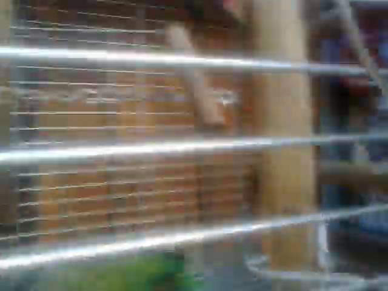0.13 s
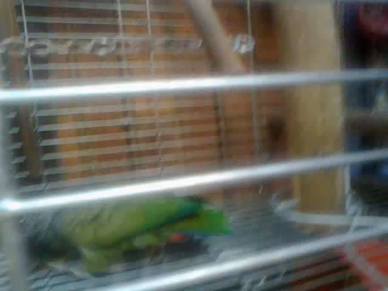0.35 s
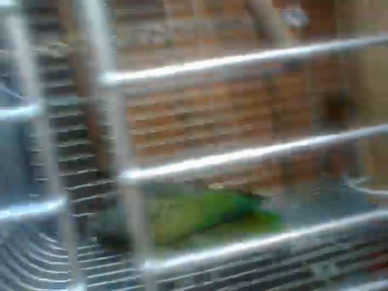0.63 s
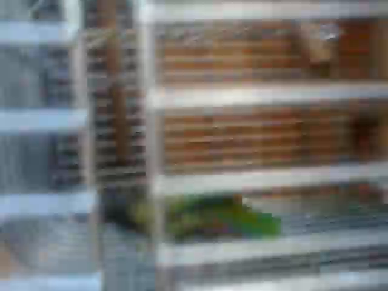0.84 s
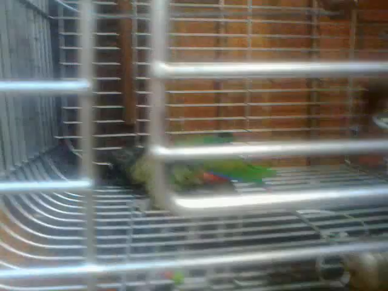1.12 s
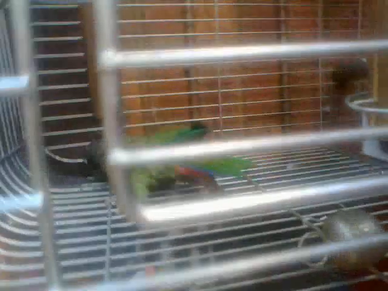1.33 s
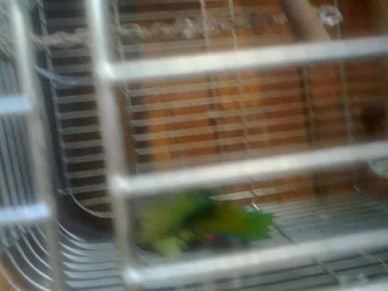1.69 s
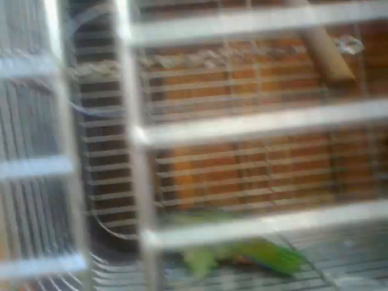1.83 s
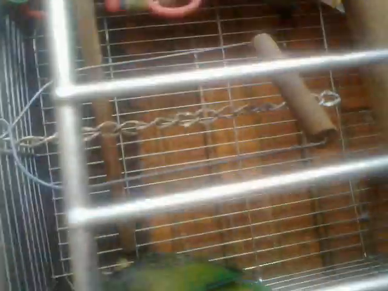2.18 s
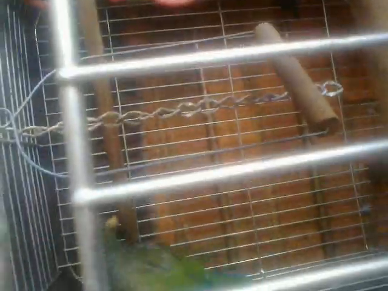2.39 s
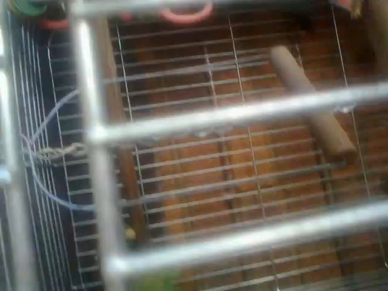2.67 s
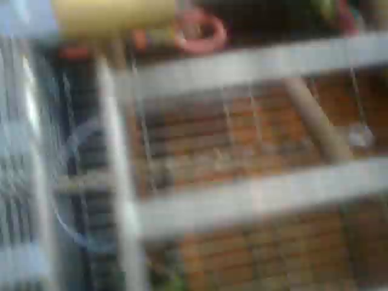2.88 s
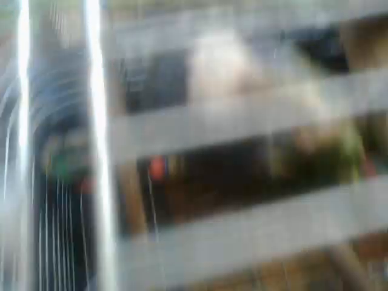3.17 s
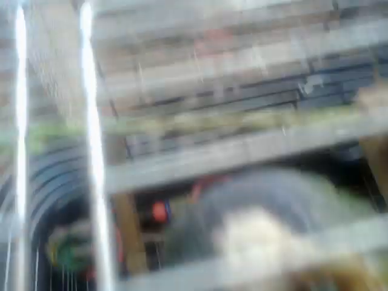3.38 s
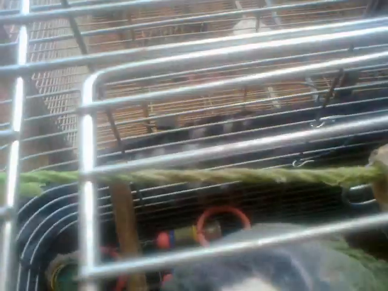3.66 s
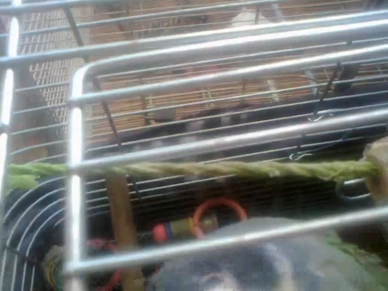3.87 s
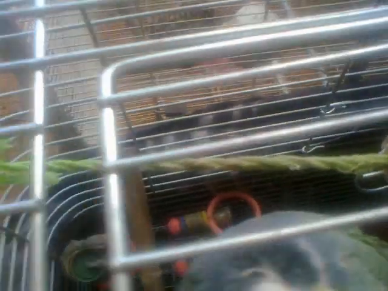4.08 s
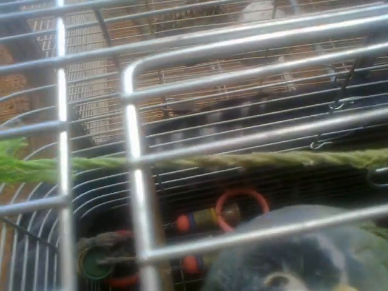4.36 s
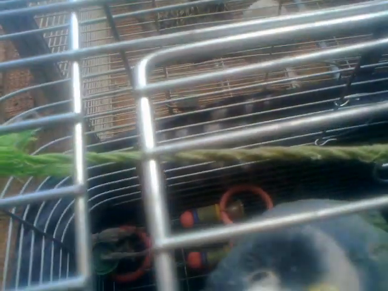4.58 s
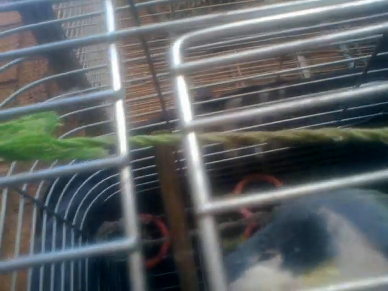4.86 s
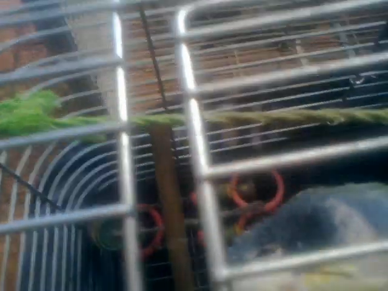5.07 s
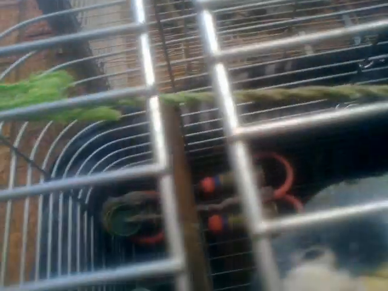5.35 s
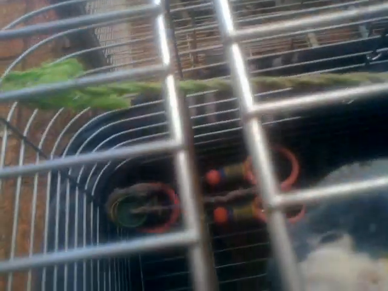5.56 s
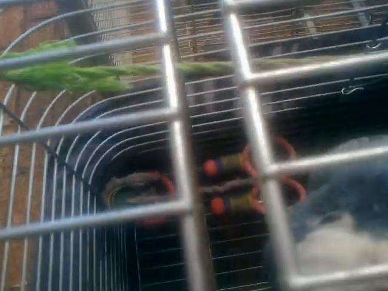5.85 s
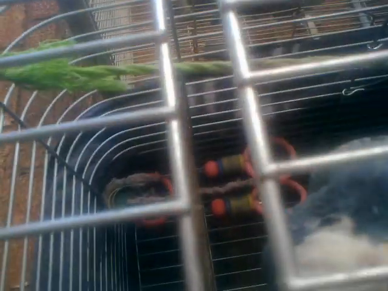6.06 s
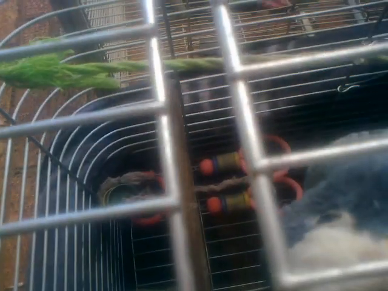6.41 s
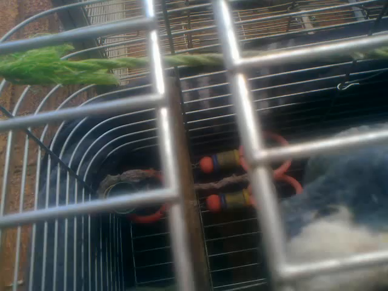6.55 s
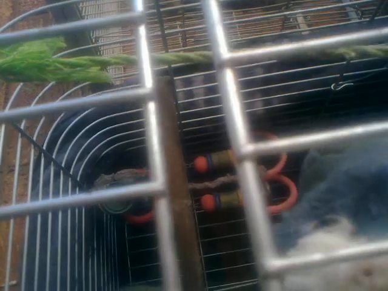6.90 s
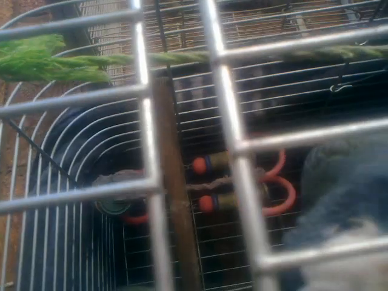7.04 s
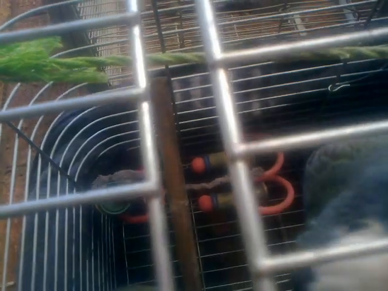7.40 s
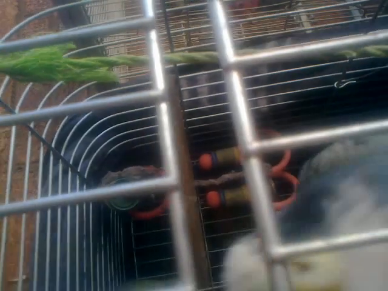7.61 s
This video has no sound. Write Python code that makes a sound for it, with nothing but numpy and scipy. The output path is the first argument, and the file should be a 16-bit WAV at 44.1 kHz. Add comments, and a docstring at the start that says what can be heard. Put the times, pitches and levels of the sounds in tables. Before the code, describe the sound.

A hand-held camera rubs and knocks on cage bars, a wire pings and a joint creaks, then a parrot's beak cracks dry shells.

```python
"""Parrots crack peanut shells in a wire cage in a small room, close to a hand-held camera. At first the camera
rubs and knocks along the bars (shaped noise and tiny chirps); short scuffs follow. Then a wire pings as a set
of fading tones, something drags along the cage and bumps, and a joint creaks in slips. Next a beak snaps the
dry shell piece by piece (bursts of clicks), amid nibbling and fine crackle. One bird gives soft, hoarse mutters
(noisy pulses); a few thin squeaks come among the last snaps."""
import sys
import numpy as np
from scipy import signal
from scipy.fft import rfft, irfft, next_fast_len
from scipy.io import wavfile
from scipy.ndimage import map_coordinates

SR = 44100
rng = np.random.default_rng(int(sys.argv[2]) if len(sys.argv) > 2 else 0)


def file_out(sig):
    """Save sig as 16-bit WAV at sys.argv[1]."""
    # one column per channel
    cols = np.atleast_2d(sig).T
    # limit, then scale
    lim = np.clip(cols, -1, 1)
    pcm = np.round(lim * 32767).astype(np.int16)
    wavfile.write(sys.argv[1], SR, pcm)


N = 340893
SIZE = 2048  # samples in a short pulse
HZ = np.fft.rfftfreq(SIZE, 1 / SR)  # the frequencies of such a pulse
TIME = np.arange(N) / SR  # seconds

# breaks in the shell: t/s, level/dB, hollow pod level/dB, pod resonance f/Hz, extra top treble/dB, tear length/s
CRACKS = [(2.6957, -53.5, -8, 1000, -14, .002), (2.8474, -45, -7, 1210, -15, .0033),
          (3.0182, -38, -24, 2080, -17, 0.00073), (3.0864, -45, 10, 1430, 0, .004),
          (3.304, -44, 1.5, 2720, 9, 0.021), (3.3408, -48, 11, 1210, 2, 0.0021),
          (3.4097, -41.5, -18, 1900, 5, 0.0008), (3.585, -35, -16, 2430, -4, 0.00099),
          (3.7501, -30.5, -3, 2430, 2, 0.0013), (3.755, -19.5, -20, 2500, 10, .0018),
          (3.7806, -19.5, -12, 2200, 1.5, 0.00059), (3.7986, -26, -6, 1700, 6, .0004),
          (3.824, -39, -6, 1940, 7, .0037), (3.8361, -29.5, 6, 1800, 12, .003),
          (3.8393, -20, 5, 1600, 4, 0.0022), (3.8856, -34.5, 3, 2200, 10, .0009),
          (3.9086, -29.5, 14, 1210, 7, 0.00095), (3.9807, -42, -1, 2410, 7, .0006),
          (3.993, -38.5, 3, 2620, 11, .005), (4.044, -37.5, 6.5, 2000, 15, 0.00034),
          (4.0546, -36, -12, 2200, 11, .0016), (4.355, -47.5, 8, 1890, -1, .003),
          (4.389, -46.5, -4, 2200, -7, 0.0023), (4.4486, -44, 3, 1300, 5, 0.0018),
          (4.505, -49.5, 3, 2800, 8, .004), (4.549, -45, -2, 2800, 8, 0.0099),
          (4.8142, -48, -13, 2500, 4, .0035), (4.8712, -42, -7, 1800, 6, .004),
          (4.9334, -38, 0, 2770, -6, 0.004), (4.9446, -35.5, 1, 2500, 7, 0.0089),
          (4.9656, -34.5, -8, 2500, 3, 0.0065), (4.9856, -26.5, -1, 3130, 4, 0.0023),
          (5.176, -47.5, 2, 1300, 4, 0.018), (5.273, -52, 9, 2350, 1, .004),
          (5.346, -33.5, 1, 2200, 10, 0.0065), (5.3631, -24.5, 1.5, 2430, 7, .003),
          (5.427, -43, -3, 2290, 7, 0.0037), (5.4775, -22, -2, 2350, 11, 0.0015),
          (5.6223, -21.5, -3, 2400, -8.5, 0.0012), (5.7236, -48.5, 1, 2100, 10, 0.004),
          (6.263, -52.5, -3, 2500, -8, 0.0036), (6.3611, -36.5, 3.5, 2330, 11, .0027),
          (6.3838, -37, -5, 2000, 6, .002), (6.3921, -29.5, 4.5, 2020, 13.5, 0.0013),
          (6.4383, -40, 11, 2300, 2, .0036), (6.5078, -29, -6, 2260, 2, 0.0032),
          (6.51, -31, 5, 2310, 5.5, 0.0014), (6.843, -49, -18, 2000, -1, 0.0059),
          (6.963, -41, 10, 1380, -1, .0037), (6.9826, -44, -9, 1900, 8, 0.0038),
          (7.055, -30, 1, 2530, 6.5, 0.0026), (7.0641, -32, -2, 2730, 6, 0.0016),
          (7.385, -46.5, -18, 1910, 12, .0027), (7.4084, -45.5, 8, 1670, 4, .004),
          (7.5257, -19.5, -13, 1970, 7, 0.002), (7.5356, -33, -8, 2700, 9, .0015)]
# tone colour of dry shell: f/Hz, level/dB
SHELL = [(200, -28), (700, -19.5), (1200, -14), (2200, -15.5), (3400, -13), (4700, -5), (6200, 2.5),
         (7600, -1), (9200, 0), (11000, -4.5), (13000, -11), (16000, -17)]


def amp(db):
    """Turn decibels into a gain."""
    return 10 ** (np.asarray(db) / 20)


def unit(x):
    """Scale to an rms (average strength) of 1."""
    return x / np.sqrt(np.mean(x ** 2) + 1e-20)


def blow(x):
    """Scale a short pulse so that its energy is that of 5 ms at rms 1."""
    return x * np.sqrt(.005 * SR / np.sum(x ** 2))


def along(points, hz):
    """Read a curve of (Hz, value) points on a log frequency axis."""
    f, v = np.transpose(points)
    return np.interp(np.log(hz + 1), np.log(f), v)


def curves(rows):
    """Give one value per sample for each column after the time."""
    s, *cols = np.transpose(rows)
    return [np.interp(TIME, s, c) for c in cols]


def wobble(rate):
    """Make a smooth random curve with this many knots a second."""
    knots = rng.standard_normal(int(N * rate / SR) + 4)
    coarse = TIME[::8]
    return np.interp(TIME, coarse, map_coordinates(knots, [coarse * rate]))


def filtered(x, response):
    """Shape x by a response that depends on frequency."""
    m = next_fast_len(len(x) + 8192)
    spectrum = rfft(x, m) * response(np.fft.rfftfreq(m, 1 / SR))
    return irfft(spectrum, m)[:len(x)]


def noise(spectrum, grain_db=0):
    """Coloured noise of rms 1; grain_db clumps it into tiny catches."""
    drive = rng.standard_normal(N) * amp(grain_db * wobble(700))
    return unit(filtered(drive, lambda hz: amp(along(spectrum, hz))))


def causal(db):
    """The response with these gains on the HZ grid that acts as early as possible (minimum phase)."""
    c = irfft(np.log(amp(db)))
    return np.exp(rfft(np.r_[c[0], 2 * c[1:SIZE // 2]], SIZE))


def hump(hz, centre_hz, q):
    """One resonance; a larger q makes it narrower."""
    return 1 / (1 + 1j * q * (hz / centre_hz - centre_hz / (hz + 1)))


def resonances(modes):
    """The joint response of several (Hz, Q, dB) resonances, with alternating signs."""
    return lambda hz: sum((-1) ** k * amp(db) * hump(hz, centre, q) for k, (centre, q, db) in enumerate(modes))


def envelope(s, length, attack, t60):
    """Rise from s, hold until s + length, die away by 60 dB in t60."""
    t = TIME - s
    return np.clip(t / attack, 0, 1) * amp(-60 * np.clip((t - length) / t60, 0, 3))


def add(track, s, x):
    """Mix x into track at s seconds."""
    i = max(round(s * SR), 0)
    track[i:i + len(x)] += x[:N - i]


def in_room(x, wet_db, spread=None):
    """A sound plus a diffuse tail from cage and walls; spread is what it sends in all other directions."""
    # how fast the tail dies: f/Hz, time to fall 60 dB/s
    tail_times = [(300, 0.27), (2000, 0.22), (7000, 0.23), (11000, 0.21), (16000, 0.16)]
    hz, t, z = signal.stft(rng.standard_normal(SR // 3), SR, nperseg=256)
    fading = z * amp(-60 * t / along(tail_times, hz)[:, None])
    tail = signal.istft(fading, SR, nperseg=256)[1]
    t = TIME[:len(tail)]
    tail = tail * (1 + 1.03 * np.exp(-t / 0.014)) * (1 - np.exp(-t / 0.0012))  # stronger early, soft onset
    wet = signal.fftconvolve(x if spread is None else spread, tail / np.linalg.norm(tail))
    return np.pad(x, (0, len(tail) - 1)) + amp(wet_db) * wet


def background():
    """Room rumble and hiss, a faint high whine and low stirring, all made from filtered noise."""
    # colour of the room's rumble and hiss: f/Hz, level/dB
    air_colour = [(12, -28), (20, 5), (65, 4), (177, -10), (357, -15), (607, -21), (849, -24.5),
                  (1190, -34), (2080, -25), (2990, -28.5), (9670, -29), (10500, -32), (14700, -33),
                  (16000, -40)]
    # colour of the low stirring: f/Hz, level/dB
    stir_colour = [(70, -21), (150, 4), (280, 1.5), (430, 3.5), (700, -7.5), (1000, -3), (1800, -16),
                   (4000, -20), (8000, -38)]
    # course of the stirring: t/s, relative level/dB
    stir_course = [(1.1, -59), (1.19, -59.5), (2.24, -55.5), (2.57, -57.5), (2.79, -62), (3.65, -60),
                   (4.13, -68.5), (4.54, -54.5), (4.68, -65), (5.57, -62), (7.27, -67.5), (7.7, -69)]
    stir_db, = curves(stir_course)
    air = amp(-55.5 + .8 * wobble(7.6)) * noise(air_colour)
    whine_tone = filtered(rng.standard_normal(N), lambda hz: hump(hz, 10450, q=50) ** 2)
    whine = amp(-82.0) * unit(whine_tone)
    stir = amp(stir_db - 1.0 + 2.55 * wobble(12)) * noise(stir_colour, grain_db=2.5)
    return air + whine + stir


def rubbing():
    """The camera slides over the wires in strokes: rumble, a dull lumpy body noise, a grainy scrape, fine hiss."""
    # strokes along the cage: t/s, length/s, rumble level/dB, body level/dB, scrape level/dB, hiss level/dB
    strokes = [(-.02, 0.053, -49, -32, -41.5, -48.5), (0.051, .055, -42.5, -35.5, -44.5, -48.5),
               (0.106, 0.05, -42.5, -38.5, -46.5, -68), (0.168, 0.049, -52, -35.5, -36.5, -60),
               (0.26, 0.081, -58, -37.5, -44.5, -47), (0.339, 0.087, -58, -49.5, -46.5, -49),
               (0.432, 0.078, -57, -38.5, -42.5, -60), (0.521, 0.056, -51, -39, -41, -55.5),
               (0.598, 0.13, -45.5, -39, -40.5, -47.5), (0.735, 0.095, -38.5, -33.5, -37.5, -39.5),
               (0.851, 0.073, -36.5, -39.5, -36.5, -42.5), (0.97, 0.06, -38, -47.5, -43, -51.5),
               (1.1, 0.065, -49.5, -58.5, -67, -76)]
    # colours of the four noises, each: f/Hz, level/dB
    rumble_colour = [(10, -16), (25, -3.5), (60, -5), (110, -7), (180, -17), (400, -59)]
    body_colour = [(60, -28), (130, -18), (210, -7.5), (270, -4), (330, -0.5), (420, 0.5), (530, -2.5),
                   (640, -9), (1100, -20.5), (1800, -41)]
    scrape_colour = [(400, -8), (1000, 4), (1700, -2), (3500, -9), (6000, -26), (12000, -41)]
    hiss_colour = [(1500, -3), (4500, 0.5), (8500, 0), (12000, -5), (16000, -16)]
    power = 0
    for s, length, *levels in strokes:
        power = power + np.outer(amp(levels), envelope(s, length, attack=0.023, t60=0.2)) ** 2
    rumble = noise(rumble_colour)
    body = amp(1.9 * wobble(60.45)) * noise(body_colour, grain_db=3.5)
    scrape = amp(2.43 * wobble(89.8)) * noise(scrape_colour, grain_db=1.5)
    hiss = noise(hiss_colour, grain_db=2.5)
    return np.sum(np.sqrt(power) * [rumble, body, scrape, hiss], axis=0)


def knocks():
    """Bending waves in a bar bring the treble first, so each knock is a tiny falling chirp; dull ones shake the frame."""
    # knocks on the bars beside the camera: t/s, level/dB, centre f/Hz
    hits = [(0.094, -24, 830), (0.1047, -19.5, 764), (0.1516, -32.5, 412), (0.1966, -28, 1450),
            (0.265, -33, 2510), (0.2723, -22.5, 407), (0.6491, -18, 1650), (0.6926, -23, 935),
            (0.7088, -29.5, 467), (0.811, -21, 337), (0.8622, -26, 360), (0.8662, -18, 460),
            (0.877, -11.5, 330), (0.8801, -25, 350), (0.8869, -29, 374), (1.0177, -20, 1770)]
    # the shaken cage frame: f/Hz, time to fall 60 dB/s, relative level/dB
    frame_modes = [(163, 0.035, 1), (218, 0.1, -3.5), (327, 0.088, 0.5), (645, .06, -26)]
    out, t = np.zeros(N), TIME[:SR // 8]
    travel = np.exp(-4j * np.pi * 0.0399 * np.sqrt(HZ))  # delays low pitches more
    for s, db, centre_hz in hits:
        contact = hump(HZ, centre_hz, q=0.91) / (1 + 1j * HZ / (centre_hz * 2.4)) ** 2
        chirp = blow(irfft(travel * contact))
        add(out, s - .0008, amp(db) * in_room(chirp, wet_db=-16))
        frame = 0
        for hz, t60, level in frame_modes:
            frame = frame + amp(level - 60 * t / t60) * np.sin(2 * np.pi * (hz * t + rng.random()))
        dullness = (330 / centre_hz) ** 2
        add(out, s, amp(db - 3.0) * dullness * frame * (1 - np.exp(-t / 0.0007)))
    return out


def scuffs():
    """Brief rattling contacts: spiky noise through a resonance, swelling and dying away."""
    # short scuffs on the cage: t/s, level/dB, centre f/Hz, rise/s, time to fall 60 dB/s
    contacts = [(.178, -33.5, 2860, 0.018, .16), (1.438, -52.5, 1150, 0.009, .3),
                (1.45, -48.5, 423, 0.0063, 0.51), (1.57, -60, 7400, 0.011, 0.81), (1.87, -51, 259, .03, .5),
                (1.96, -57.5, 1290, 0.032, 0.7), (2.96, -51.5, 406, .0034, 0.37),
                (5.08, -57.5, 970, 0.0082, .6), (5.712, -53, 390, 0.011, 0.38),
                (6.05, -59.5, 790, 0.011, .13), (6.44, -48, 45.2, .01, 1)]
    out, t = np.zeros(N), TIME[:SR // 2]
    for s, db, centre_hz, rise, t60 in contacts:
        chatter = rng.standard_normal(len(t)) ** 3  # cubing makes it spiky
        rasp = unit(filtered(chatter, lambda hz: hump(hz, centre_hz, q=1.0) ** 2))
        swell = np.minimum(t / rise, amp(-60 * (t - rise) / t60))
        add(out, s, amp(db) * rasp * swell)
    return out


def wire():
    """A plucked cage wire rings in close, wavering pairs of modes and buzzes against its neighbours."""
    # touches of the wire: t/s, relative level/dB
    touches = [(1.757, -39.5), (1.855, -50), (2.025, -53)]
    # its ringing modes: f/Hz, relative level/dB, time to fall 60 dB/s
    wire_modes = [(971, -5.5, 0.36), (1810, -11, 1), (2980, -6, 0.6), (4550, -12.5, 0.49), (6190, -7, 0.71),
                  (6200, -4.5, 0.25), (6430, -2, 0.17), (8000, -14, .2), (8270, -6.5, 0.5),
                  (10150, -15, 0.19), (10500, -5.5, 0.21), (10440, -1, 0.14), (13400, -13, 0.22)]
    out, t = np.zeros(N), TIME[:SR]

    def waver(hz):
        """Random phase drift in cycles, larger for high modes."""
        return np.cumsum(rng.normal(0, .00024 * np.sqrt(hz), SR)) + rng.random()

    for s, db in touches:
        ring = 0
        for hz, level, t60 in wire_modes:
            fade = amp(level + rng.normal(0, 2.8) - 60 * t / t60)
            ring = ring + fade * np.sin(2 * np.pi * (hz * t + waver(hz)))
        buzz = 1 + .45 * wobble(110)[:SR]
        tick_fade = 0.75 * amp(-60 * t / 0.12) + amp(-13.5 - 60 * t / 1.5)
        tick = tick_fade * rng.standard_normal(len(t))
        add(out, s, amp(db - 4.5) * in_room(ring * buzz + tick, wet_db=2.0))
    return out


def dragging():
    """Something drags along the cage with a low stick-slip hum, lets go and rattles on its own resonances."""
    # the drag before it lets go: t/s, relative level/dB, slips per second f/Hz
    drag = [(2.15, -74, 255), (2.27, -58.5, 256), (2.4, -67, 185), (2.47, -56.5, 263), (2.51, -63, 214),
            (2.545, -48.5, 205), (2.6, -51.5, 190), (2.62, -77, 210)]
    # the bumps as it lets go: t/s, level/dB
    bump_hits = [(2.484, -54.5), (2.604, -36.5), (2.612, -35.5)]
    # resonances of the bumps: f/Hz, sharpness Q, relative level/dB
    bump_modes = [(122, 9, 1.5), (362, 9.5, 0.5), (682, 7.4, -3), (834, 29, -0.5), (1040, 17, 0.5),
                  (1570, 22, -12), (1720, 13, -13.5), (2500, 8, -18.5), (3260, 3.5, -24.5)]
    rattle_gap_s, rattle_db, rattle_loss_db = .017, -42, 1.54  # mean spacing, first level, loss per rebound
    level_db, slip_hz = curves(drag)
    slip_count = np.floor(np.cumsum(slip_hz * (1 + 0.051 * wobble(130))) / SR)
    slips = np.diff(slip_count, prepend=0)  # one click per slip

    def hum_colour(hz):
        """Two resonances, dull above 1500 Hz."""
        return (hump(hz, 315, q=1.5) + .5 * hump(hz, 890, q=4.4)) / (1 + (hz / 1500) ** 4)

    hum = unit(filtered(slips, hum_colour))
    out = hum * amp(level_db + 1.5) * (TIME > drag[0][0]) * (TIME < drag[-1][0])
    bump = blow(irfft(resonances(bump_modes)(HZ)))
    flights = rattle_gap_s * np.cumsum(.5 + rng.random(size=7))  # seconds after the last bump
    rebounds = [(bump_hits[-1][0] + flight, rattle_db - rattle_loss_db * k) for k, flight in enumerate(flights)]
    for s, db in bump_hits + rebounds:
        add(out, s, amp(db) * in_room(bump, wet_db=2.5))
    return out


def creak():
    """A joint of the cage sticks and slips; each slip is a short rough slide that swells to its release."""
    # slips of one creak, released 0.6 ms after t: t/s, level/dB
    releases = [(2.352, -41.5), (2.3629, -33.5), (2.3754, -29), (2.3885, -30.5), (2.4, -32.5),
                (2.4059, -32)]
    # colour of the joint: f/Hz, level/dB
    joint_colour = [(150, -25), (400, -9), (800, -19.5), (1050, 0), (1350, 1), (1800, -15), (2600, -16.5),
                    (3500, -18.5), (5500, -27), (8300, -31), (10000, -40)]
    out, lead = np.zeros(N), SIZE // 8  # lead: samples before the release
    slide = np.exp(-np.abs(TIME[:SIZE] - lead / SR) / 0.0013)
    for s, db in releases:
        force = 0.2 * rng.standard_normal(SIZE) * slide
        force[lead] += 1
        slip = blow(irfft(rfft(force) * amp(along(joint_colour, HZ))))
        add(out, s + .0006 - lead / SR, amp(db) * in_room(slip, wet_db=-7.5))
    return out


def crumbling():
    """Tiny fibres crackle just before and after every snap, over a very faint steady floor."""
    level_db, usual_tear_s, floor_db = -23.5, 0.0032, -78  # level under a snap with the usual tear length
    rise_s, fall_s = .012, 0.047
    power, t = np.zeros(N), TIME[:SR // 2] - .1  # starts 0.1 s before the snap
    swell = np.exp(np.minimum(t / rise_s, -t / fall_s))
    for s, db, *_, length in CRACKS:
        add(power, s + t[0], (amp(db + level_db) * swell) ** 2 * length / usual_tear_s)  # long tears shed more
    level = np.sqrt(power + amp(floor_db) ** 2)
    return level * amp(2 * wobble(60)) * noise(SHELL, grain_db=8.5)


def nibbles():
    """The beak works the shell between snaps: faint ticks at random moments, as rows like those of CRACKS."""
    start, end, per_second = 2.75, 5.5, 4
    tick_db, pod_db, pod_hz, tear_s = -56.5, 0, 2100, 0.0036
    draws = rng.random((int((end - start) * per_second), 3))
    return [(start + (end - start) * when, tick_db + 6 * (force - .5), pod_db, pod_hz, 10 * bright, tear_s)
            for when, force, bright in draws]


def cracks():
    """Fibres give way in a quick run, the shell snaps, and the hollow pod rings for a moment."""
    out, lead = np.zeros(N), SIZE // 8  # lead: samples before the snap
    t = TIME[:SIZE] - lead / SR
    top = 1 / (1 + (8500 / (HZ + 1)) ** 8)  # picks out the top treble
    linger = np.exp(5j * np.exp(-HZ / 5000) + 3j * np.tanh((9500 - HZ) / 2500))  # lows and the top arrive late
    for s, db, pod_db, pod_hz, top_db, length in CRACKS + nibbles():
        tear = np.exp(-np.abs(t) / max(length, 1e-4) * np.where(t < 0, 2.5, 1))
        breaks = rng.choice([-1, 1], SIZE) * rng.uniform(.4, 1.3, SIZE)
        fibres = breaks * (rng.random(SIZE) < .16) * tear  # only some moments hold a break
        fibres[lead] = 1 + np.exp(-length / .001) * 2.5  # a short tear is one clean snap
        pod = amp(pod_db) * np.abs(hump(HZ, pod_hz, q=1.55)) ** 2
        shell = amp(along(SHELL, HZ) + top * top_db)
        # each piece rings its own way
        splinter_db = 2 * map_coordinates(rng.standard_normal(SIZE // 32), [HZ / 700])
        colour = causal(10 * np.log10(shell ** 2 + pod ** 2) + splinter_db)
        snap = blow(irfft(rfft(fibres) * colour * linger))
        spread = np.roll(blow(irfft(colour)), lead)
        add(out, s - lead / SR, amp(db) * in_room(snap, wet_db=-5.0, spread=spread))
    return out


def mutter():
    """Uneven, noisy voice pulses pass throat and beak resonances; opening the beak makes them higher and louder."""
    # a bird's mutters: t/s, length/s, level/dB, time until the beak is widest/s
    calls = [(4.324, 0.18, -45, 0.057), (4.599, 0.055, -44.5, 0.079)]
    closed_hz, open_hz, closed_db = 1130, 1930, -8  # throat resonance; level change when closed
    opening_s = .055  # half the width of a gape
    opening = sum(np.exp(-((TIME - s - widest) / opening_s) ** 2) for s, _, _, widest in calls)
    effort = sum(amp(db) * envelope(s, length, attack=0.01, t60=0.089) for s, length, db, _ in calls)
    throat_hz = closed_hz + (open_hz - closed_hz) * opening
    cycles = np.cumsum(215 * np.exp(0.15 * wobble(120))) / SR  # about 215 pulses a second
    pulses = unit(np.diff(np.floor(cycles), prepend=0)) + .55 * rng.standard_normal(N)
    # shift the throat pitch to zero, keep what lies near it, shift back
    turn = np.exp(2j * np.pi * np.cumsum(throat_hz) / SR)
    near_throat = signal.lfilter(*signal.butter(2, 350, fs=SR), pulses / turn)
    throat = unit((turn * near_throat).real)
    beak = unit(filtered(pulses, lambda hz: hump(hz, 3820, q=4.0) ** 3))
    voice = throat + amp(-11) * beak * throat_hz / open_hz
    return in_room(voice * effort * amp(closed_db * (1 - opening)), wet_db=-9)[:N]


def peeps():
    """Thin, faint squeaks: a slightly unsteady tone with weak overtones."""
    # squeaks: t/s, relative level/dB, f/Hz, length/s
    squeaks = [(6.927, -63, 4400, .035), (7.16, -62, 4420, 0.068), (7.371, -62, 4430, 0.04)]
    # partial tones of a squeak: multiple of its pitch, relative level/dB
    partials = [(1, -3), (2, -10), (3, -9)]
    out = np.zeros(N)
    for s, db, hz, length in squeaks:
        t = TIME[:int(length * SR)]
        phase = np.cumsum(hz * (1 + 0.0056 * wobble(360)[:len(t)])) / SR
        tone = sum(amp(level) * np.sin(2 * np.pi * k * phase) for k, level in partials)
        add(out, s, amp(db) * np.sqrt(np.sin(np.pi * t / length)) * tone)
    return out


def scene():
    """Everything at one microphone."""
    cage = knocks() + rubbing() + scuffs() + wire() + creak() + dragging()
    birds = cracks() + crumbling() + mutter() + peeps()
    return (cage + birds + background())[None]


def record(dry):
    """The camera cuts steeply everything above its band limit of 16 kHz."""
    return np.array([filtered(channel, lambda hz: 1 / (1 + (hz / 16000) ** 160)) for channel in dry])


dry = scene()
out = record(dry)
file_out(out)
```